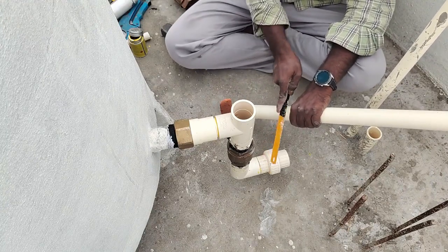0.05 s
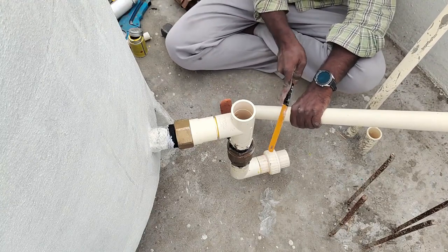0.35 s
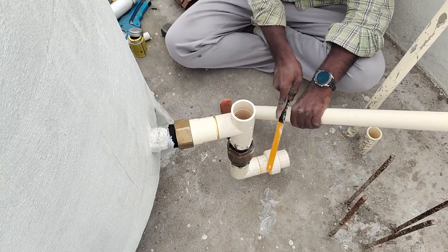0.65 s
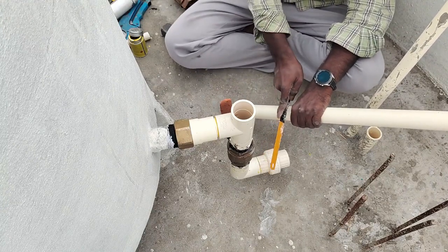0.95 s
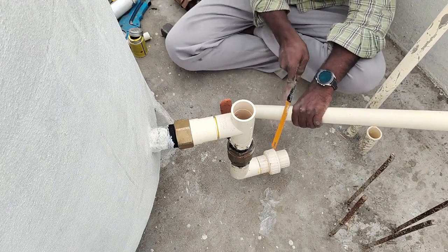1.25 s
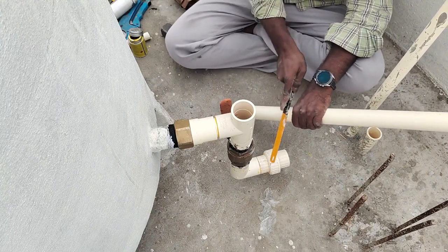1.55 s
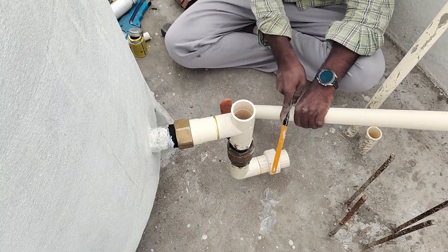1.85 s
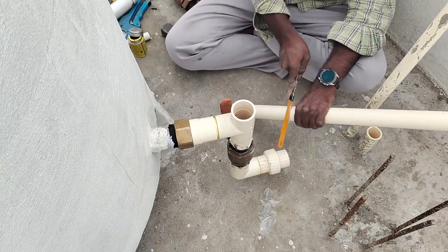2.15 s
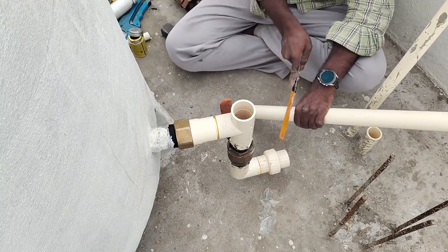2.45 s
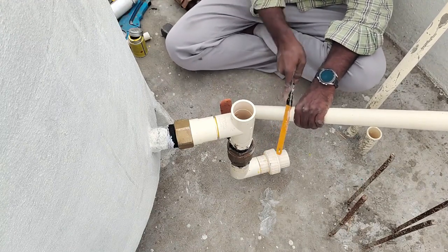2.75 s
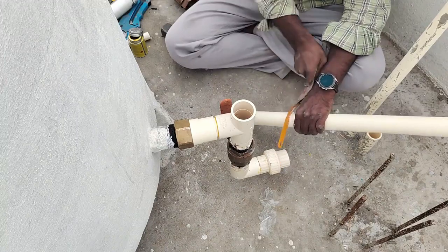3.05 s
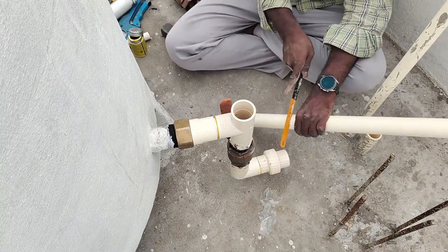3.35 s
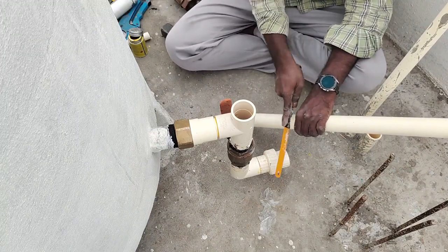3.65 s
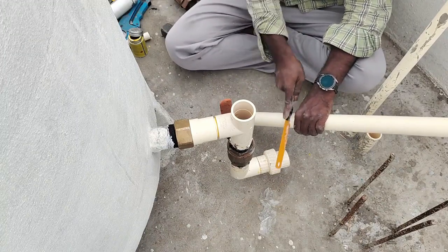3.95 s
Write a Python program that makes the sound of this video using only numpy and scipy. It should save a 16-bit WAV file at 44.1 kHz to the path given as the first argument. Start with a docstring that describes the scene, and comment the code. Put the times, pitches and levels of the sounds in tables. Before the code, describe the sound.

A hacksaw blade rasps quickly back and forth through a plastic pipe close by, snagging and clicking, with one brief squeal. It stalls near the end, then starts again, over a steady low outdoor rumble.

```python
"""Hacksaw blade on plastic pipe.

A bare blade is worked quickly to and fro on a concrete terrace, stalls, and starts again.
Its teeth tick and scrape in the cut, ringing pipe and blade; it snags, knocks, chatters and
squeals once, and the pipe groans at the restart. Behind: low rumble, faint distant whistles."""
import sys
import numpy as np
from scipy import signal
from scipy.fft import rfft, irfft
from scipy.io import wavfile
from scipy.ndimage import uniform_filter1d

SR = 44100
rng = np.random.default_rng(int(sys.argv[2]) if len(sys.argv) > 2 else 0)


def persist_wave(psi):
    """Save psi, clipped to +-1, as 16-bit WAV."""
    counts = np.round(np.clip(psi, -1, 1) * 32767).astype(np.int16)
    wavfile.write(sys.argv[1], SR, np.atleast_2d(counts).T)


N = 176400
T, HZ = np.arange(N) / SR, np.maximum(np.fft.rfftfreq(N, 1 / SR), 1)
STEREO_ABOVE_HZ = 780


def undb(db):
    """Decibels to gain."""
    return 10 ** (np.asarray(db) / 20)


def unit(x):
    """Scale to rms 1."""
    return x / np.sqrt(np.mean(np.abs(x) ** 2))


def pan(left_minus_right_db):
    """Left and right gains."""
    return undb(np.array([[.5], [-.5]]) * left_minus_right_db)


def curve(points):
    """(f/Hz, value) points interpolated over log frequency."""
    hz, value = np.array(points).T
    return np.interp(np.log(HZ), np.log(hz), value)


def above(hz, order):
    """High-pass gain per frequency."""
    return 1 / (1 + (hz / HZ) ** order)


def wander(hz):
    """Smooth noise, rms 1, rolling off above hz."""
    return unit(irfft(rfft(rng.standard_normal(N)) / (1 + (HZ / hz) ** 4), N))


def decay(start_s, tau_s):
    """1 until start_s, then an exponential fall."""
    return np.exp(-np.clip((T - start_s) / tau_s, 0, 20))


def minimum_phase(gain, size=2048):
    """Causal impulse response with this gain per frequency."""
    cepstrum = irfft(np.log(gain + 1e-5), N)
    cepstrum[1:N // 2] *= 2
    cepstrum[N // 2 + 1:] = 0
    return irfft(np.exp(rfft(cepstrum)), N)[:size]


def through(x, ir):
    """Convolve, cut to N samples."""
    return signal.fftconvolve(x, ir)[:N]


def sine(hz):
    """Sine of varying pitch, rms 1."""
    return np.sqrt(2) * np.sin(2 * np.pi * np.cumsum(hz) / SR)


def tone(hz, points):
    """Sine following (t/s, level/dB) points, faded out at both ends."""
    times, db = np.array(points).T
    envelope = undb(np.interp(T, times, db)) * (T > times[0]) * (T < times[-1])
    return uniform_filter1d(envelope, size=300) * sine(hz)


# Background spectrum: f/Hz, relative density/dB
RUMBLE_SPECTRUM = [(8, -4), (20, 0), (30, 2.5), (37, -6), (56, -10.5), (80, -15), (112, -18.5),
                   (155, -28.5), (200, -26.5), (225, -25), (250, -29), (300, -34), (420, -40.5), (700, -43),
                   (1000, -49.5), (1600, -50), (2500, -57), (4500, -66), (7300, -64), (10000, -66.5),
                   (15000, -75)]
# Background envelope: t/s, level/dB
RUMBLE_ENVELOPE = [(0, -18.5), (1.5, -19.5), (2.3, -18), (3.1, -18.5), (4, -20.5)]


def rumble(wide_above_hz=670, waver_db=.32, hum_hz=223.9, hum_db=-56.5):
    """Outdoor rumble, alike in both ears in the bass, with faint hiss and a wavering hum."""
    mid, side = rfft(rng.standard_normal((2, N)))
    width = HZ ** 2 / (HZ ** 2 + wide_above_hz ** 2)
    stereo = mid + np.array([[1], [-1]]) * width * side
    air = unit(irfft(undb(curve(RUMBLE_SPECTRUM)) * stereo, N))
    hum = sine(hum_hz * (1 + .0298 * wander(hz=14.63)))
    air_db = np.interp(T, *np.array(RUMBLE_ENVELOPE).T) + waver_db * wander(hz=1)
    return undb(air_db) * air + undb(hum_db) * hum


def yard(x, t60_s=.42, level_db=-8, damp_hz=3760, rise_s=.004):
    """Short, dull reverberation from the low walls around."""
    envelope = undb(-60 * np.minimum(T / t60_s, 2)) * np.minimum(T / rise_s, 1)
    tail = unit(rng.standard_normal(N) * envelope)
    dull_tail = irfft(rfft(tail) / np.sqrt(N * (1 + (HZ / damp_hz) ** 4)), N)
    return undb(level_db) * through(x, dull_tail[:SR])


# Whistles, one list of points each: t/s, f/Hz, level/dB
WHISTLE_GLIDES = [
    [(.33, 1930, -54), (.37, 1977, -55), (.41, 2000, -46), (.435, 2040, -65), (.49, 2100, -50),
     (.56, 2090, -58)],
    [(3.39, 6350, -73), (3.42, 6270, -63), (3.48, 6300, -72)],
    [(3.58, 6570, -75), (3.635, 6380, -62), (3.68, 5655, -63), (3.73, 5535, -65)],
]


def whistles(flutter_db=2.3):
    """Thin, distant gliding whistles, perhaps birds."""
    out = np.zeros(N)
    for call in map(np.array, WHISTLE_GLIDES):
        pitch_hz = np.interp(T, call[:, 0], call[:, 1]) * (1 + .0097 * wander(hz=210))
        out += tone(pitch_hz, call[:, ::2])
    return out * undb(flutter_db * wander(hz=50))


# Pipe groans: t/s, level/dB
GROAN_ONSETS = [(3.738, -36), (3.988, -35)]


def groans(centre_hz=643, width_hz=250, rise_s=.004, decay_s=.031):
    """The pipe's low, hollow resonance, rubbed as the blade is set into the cut and pushed."""
    envelope = sum(undb(db) * np.clip((T - start) / rise_s, 0, 1) * decay(start, decay_s)
                   for start, db in GROAN_ONSETS)
    resonance = 1 / (1 + (2 * (HZ - centre_hz) / width_hz) ** 2)
    return envelope * unit(irfft(rfft(rng.standard_normal(N)) * resonance, N))


# Blade squeal: t/s, level/dB
SQUEAL_ENVELOPE = [(2.334, -58), (2.353, -37), (2.365, -28.5), (2.38, -44.5), (2.429, -53), (2.522, -54)]


def squeal(pitch_hz=3043, waver=.0047, pan_db=-1):
    """The blade binds in the cut and rings at one pitch."""
    return tone(pitch_hz * (1 + waver * wander(hz=96.4)), SQUEAL_ENVELOPE) * pan(pan_db)


# Blade chatter: t/s, f/Hz, level/dB
CHATTER_BURSTS = [(0.313,8900,-31.5), (0.782,8630,-33), (1.010,8500,-36), (1.233,8766,-45),
                  (1.464,8417,-26), (2.424,8600,-37), (2.779,4200,-30), (3.139,8330,-28),
                  (3.226,2442,-31.5), (3.875,2850,-29.5)]


def chatter(half_width_s=.0034, wobble_rad=2.8, pan_db=-7):
    """The blade chatters at one resonance at a time: brief, rough, pitched zips."""
    out = np.zeros(N)
    wobble = wobble_rad * wander(hz=240)
    for peak_s, hz, db in CHATTER_BURSTS:
        envelope = np.exp(-np.minimum(((T - peak_s) / half_width_s) ** 2, 20))
        out += undb(db) * envelope * np.sin(2 * np.pi * hz * T + wobble)
    return out * pan(pan_db)


# Blade knocks: t/s, drive level/dB
KNOCK_ONSETS = [(0.856,-39), (0.946,-30), (1.307,-21), (1.518,-24.5), (2.002,-36), (3.271,-38),
                (3.36,-31.5), (3.498,-39.5)]


def knocks(decay_s=.004, tilt_db_per_octave=1.5):
    """Steel strikes the side of the cut: short, bright cracks."""
    envelope = sum(undb(db) * (T >= start) * decay(start, decay_s) for start, db in KNOCK_ONSETS)
    tilt = undb(tilt_db_per_octave * np.log2(HZ))
    return envelope * unit(irfft(rfft(rng.standard_normal((2, N))) * tilt, N))


def scatter(x, size=1024, decay_s=.0024, echo_db=5):
    """Reflections off the floor and a tank close by smear the ticks without colouring them."""
    echoes = rfft(unit(rng.standard_normal(size) * np.exp(-T[:size] / decay_s))) / np.sqrt(size)
    hz = np.fft.rfftfreq(size, 1 / SR)
    spectrum = 1 + undb(echo_db) * echoes * hz ** 2 / (hz ** 2 + STEREO_ABOVE_HZ ** 2)
    lead = size // 8
    allpass = np.roll(irfft(spectrum / np.abs(spectrum)), lead)
    return signal.fftconvolve(x, allpass)[lead:N + lead]


def shifting_contact(x, rate_hz=19, width_hz=430, depth_db=2.8, size=512):
    """The contact moves along blade and wall, so narrow resonances swell and fade at random."""
    hz, times, frames = signal.stft(x, SR, nperseg=size)
    across = np.fft.fftfreq(len(hz), hz[1])[:, None] * 2 * width_hz
    along = np.fft.fftfreq(len(times), times[1]) / rate_hz
    blur = np.exp(-(across ** 2 + along ** 2) / 2)
    noise = rng.standard_normal(blur.shape)
    patches = unit(np.fft.ifft2(np.fft.fft2(noise) * blur).real)
    _, shifted = signal.istft(frames * undb(depth_db * patches), SR, nperseg=size)
    return unit(shifted[:, :N])


def teeth(speed, full_speed_hz=758.4, jitter=.25, spread_db=4, scrape_db=-2.5):
    """An uneven tick per tooth crossing the wall, over the scrape of tearing plastic."""
    rate_hz = full_speed_hz * np.maximum(speed, .3) * np.exp(jitter * wander(hz=300))
    bites = np.diff(np.floor(np.cumsum(rate_hz) / SR), prepend=0)
    strength = undb(spread_db * rng.standard_normal(N).clip(-2, 2))
    ticks = unit(bites * strength / np.sqrt(rate_hz))
    return unit(ticks + undb(scrape_db) * rng.standard_normal(N))


# Strokes: t/s, length/s, fastest point/share of length, relative body/dB, rasp/dB, hiss/dB
ARM_STROKES = [(0.053, 0.087, 0.47, -74, -41, -41), (0.177, 0.072, 0.56, -51, -32.5, -35),
               (0.279, 0.1, 0.42, -51, -42, -41), (0.38, 0.11, 0.8, -65, -39, -38),
               (0.515, 0.094, 0.25, -49.5, -40, -37.5), (0.625, 0.1, 0.48, -53.5, -36.5, -38),
               (0.745, 0.096, 0.23, -50.5, -40.5, -38.5), (0.86, 0.091, 0.4, -49.5, -34.5, -34.5),
               (0.957, 0.119, 0.61, -52, -42, -42.5), (1.086, 0.094, 0.46, -51, -34, -35.5),
               (1.2, 0.11, 0.29, -53, -38.5, -37.5), (1.321, 0.094, 0.22, -49, -33.5, -34.5),
               (1.428, 0.094, 0.35, -51, -37.5, -36), (1.529, 0.11, 0.45, -51, -37, -38),
               (1.662, 0.097, 0.2, -57, -38.5, -36.5), (1.768, 0.1, 0.41, -49, -33, -34.5),
               (1.875, 0.11, 0.68, -53, -40.5, -40), (1.988, 0.12, 0.43, -50.5, -33, -33.5),
               (2.112, 0.12, 0.47, -56, -42, -39.5), (2.231, 0.098, 0.68, -48, -33, -36),
               (2.343, 0.15, 0.42, -54, -41.5, -38), (2.493, 0.104, 0.38, -47, -30.5, -35),
               (2.618, 0.12, 0.2, -46.5, -37.5, -35.5), (2.747, 0.11, 0.22, -45.5, -32, -35),
               (2.857, 0.11, 0.64, -51, -38.5, -33.5), (2.993, 0.096, 0.36, -44, -32.5, -35),
               (3.111, 0.052, 0.41, -48, -36, -42), (3.197, 0.059, 0.41, -50, -36.5, -37),
               (3.284, 0.105, 0.31, -62, -48.5, -46.5), (3.719, 0.12, 0.44, -48, -38, -39.5),
               (3.858, 0.095, 0.36, -49, -36, -34.5), (3.967, 0.119, 0.15, -42, -35, -35.5)]
# Teeth snagging: t/s, relative rasp/dB, hiss/dB
TOOTH_SNAGS = [(0.183,-37,-53), (0.307,-44,-32), (0.407,-35.5,-43), (0.448,-42,-31), (0.543,-49,-34),
               (0.643,-33.5,-56), (0.775,-35,-29), (1.002,-52,-27), (1.227,-57,-30.5), (1.457,-34,-37),
               (1.574,-46,-30.5), (1.675,-38,-38), (1.895,-43,-32.5), (2.171,-54,-34), (2.269,-26.5,-35),
               (2.422,-35.5,-32), (2.758,-29,-38), (2.909,-32.5,-29), (3.006,-25.5,-33), (3.039,-28.5,-47),
               (3.133,-40,-30)]


def arm(slide_s=.019, slide_db=-5, bite_rise_s=.002, snag_rise_s=.002, snag_decay_s=.011):
    """Blade speed and body, rasp, hiss drive: strokes slide lightly, then bite; snags flare and die."""
    speed, power = np.zeros(N), np.zeros((3, N))
    for start, length, fastest, *db in ARM_STROKES:
        progress = np.clip((T - start) / length, 0, 1)
        stroke = np.sin(np.pi / 2 * np.minimum(progress / fastest, (1 - progress) / (1 - fastest)))
        speed = np.maximum(speed, stroke)
        sliding = np.clip((start + slide_s - T) / bite_rise_s, 0, 1)
        power += (undb(db)[:, None] * stroke ** 1.16 * undb(slide_db * sliding)) ** 2
    for start, *db in TOOTH_SNAGS:
        flare = np.clip((T - start) / snag_rise_s, 0, 1) * decay(start + snag_rise_s, snag_decay_s)
        speed = np.maximum(speed, flare)
        power[1:] += (undb(db)[:, None] * flare) ** 2
    return speed, np.sqrt(power)


# Broad colour of the cut: f/Hz, relative level/dB
CUT_COLOUR = [(400, 3), (650, 6), (950, 2), (1250, -3), (1550, 0), (1800, 2), (2200, 3), (2900, 2.5),
              (3550, -1), (4050, 3.5), (4450, 3.5), (4800, -2), (5500, 1.5), (6300, 1), (6650, -2),
              (7200, -1), (8200, -1.5), (9500, 2), (10200, 2), (11400, -2), (12300, -3), (12800, -5.5),
              (15500, -7)]
# Pipe and blade resonances: f/Hz, width/Hz, gain over broad colour/dB
RESONANCES = [(1870, 70, 3), (2040, 100, 6), (2630, 150, 4), (3050, 70, 5), (3340, 80, 5), (4240, 130, 3),
              (5390, 160, 3), (5930, 160, 2), (8800, 200, 5), (10200, 200, 1.5), (11950, 200, 2.5)]
# Stereo balance: f/Hz, left minus right/dB
EAR_BALANCE = [(650, 0), (1500, -2), (2000, -6), (2700, -1), (3400, -4), (4000, 0), (5500, -3), (7100, -4),
               (7800, -17), (8300, -21), (8800, -16), (10200, -10), (11000, -4), (12000, -9), (12800, -3),
               (15500, -3)]


def pipe_and_blade(low_cut_hz=352):
    """Resonant gain of pipe and blade per frequency, at each ear."""
    peaks_db = sum(db / (1 + (2 * (HZ - hz) / width) ** 2) for hz, width, db in RESONANCES)
    colour = undb(curve(CUT_COLOUR) + peaks_db) * above(low_cut_hz, order=3)
    return unit(colour * pan(curve(EAR_BALANCE)))


def saw(body_db=5.5, rasp_db=-.5, hiss_db=1.5, body_top_hz=1490, rasp_top_hz=7340, judder_db=1.18):
    """Teeth and knocks drive the pipe's body, its rasping wall and the hissing blade."""
    speed, drives = arm()
    apart = .42 * above(STEREO_ABOVE_HZ, order=4)  # power share heard by one ear alone
    common = np.sqrt(1 - apart) * rfft(teeth(speed))
    separate = np.sqrt(apart) * rfft([teeth(speed), teeth(speed)])
    judder = undb(judder_db * wander(hz=149))
    force = shifting_contact(irfft(common + separate, N) * judder)
    ear_gains = pipe_and_blade()
    over_body, over_rasp = above(body_top_hz, order=12), above(rasp_top_hz, order=20)
    bands = [(1 - over_body, body_db), (over_body - over_rasp, rasp_db), (over_rasp, hiss_db)]
    excitation = knocks()
    for drive, (band, db) in zip(drives, bands):
        band_rms = np.sqrt(np.mean((ear_gains * band) ** 2))
        excitation += undb(db) * irfft(rfft(force * drive) * band, N) / band_rms
    return np.array([scatter(through(x, minimum_phase(gain))) for x, gain in zip(excitation, ear_gains)])


def scene():
    """Sawing and whistles with the yard's reverberation, over the rumble."""
    direct = saw() + chatter() + groans() + squeal() + whistles()
    return direct + np.array([yard(ear) for ear in direct]) + rumble()


def record(dry):
    """Steep low-pass."""
    top_hz = 15750
    return signal.sosfilt(signal.ellip(10, .2, 80, top_hz, fs=SR, output="sos"), dry)


dry = scene()
out = record(dry)
persist_wave(out)
```